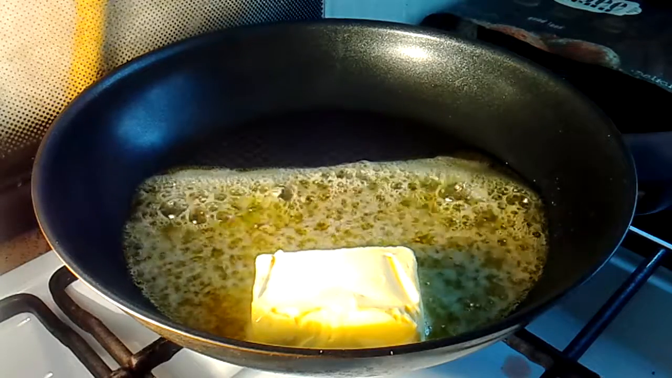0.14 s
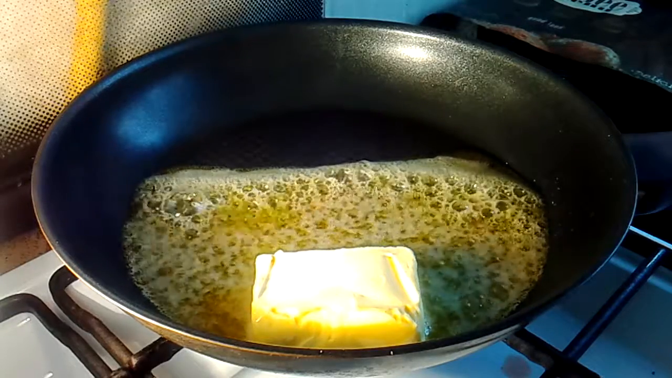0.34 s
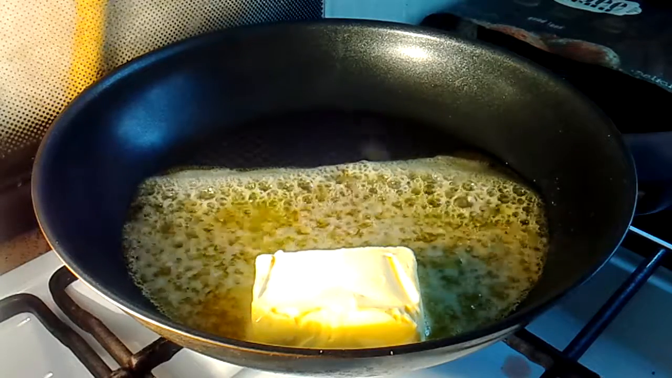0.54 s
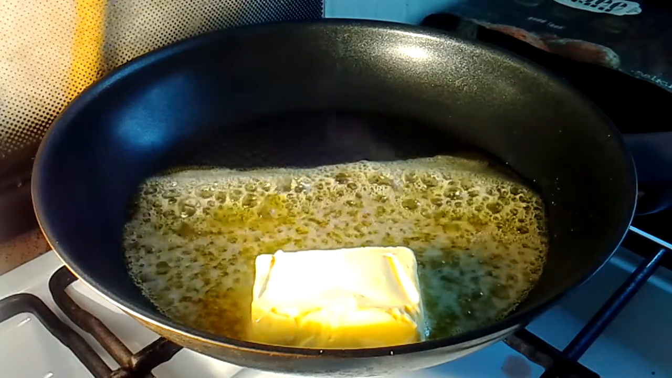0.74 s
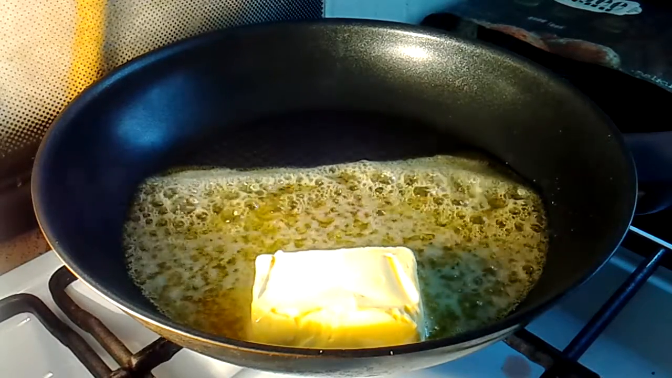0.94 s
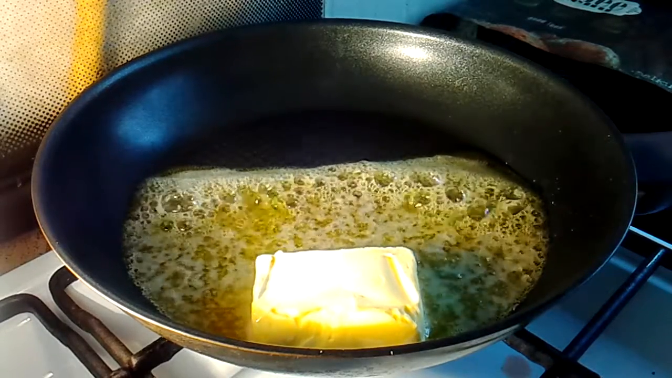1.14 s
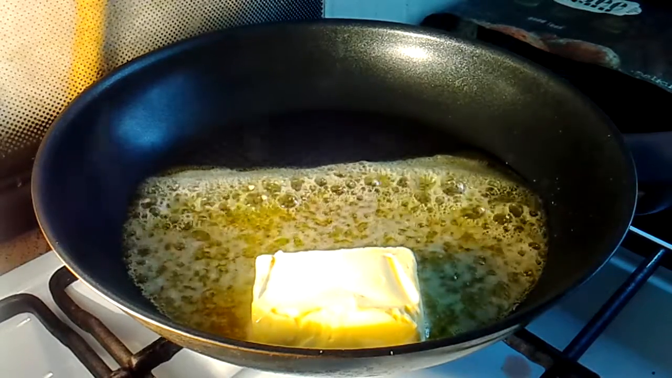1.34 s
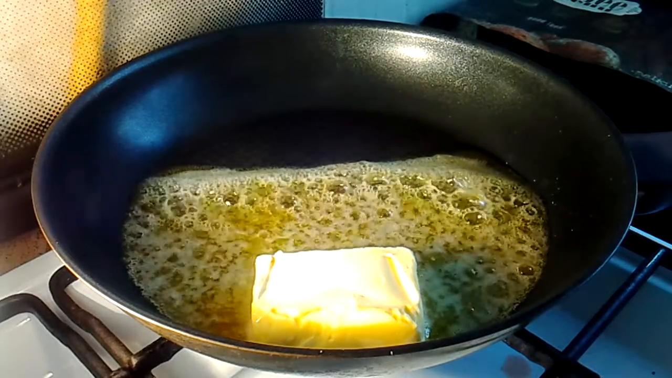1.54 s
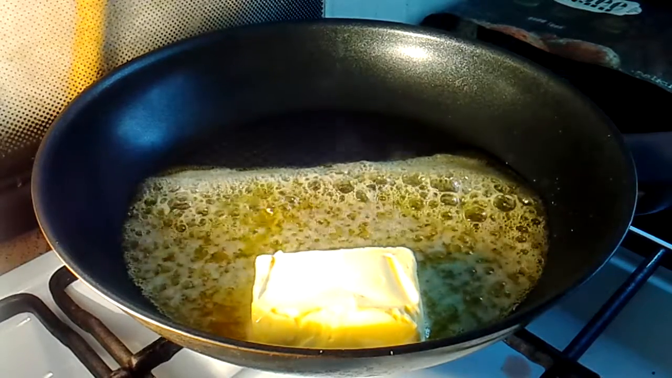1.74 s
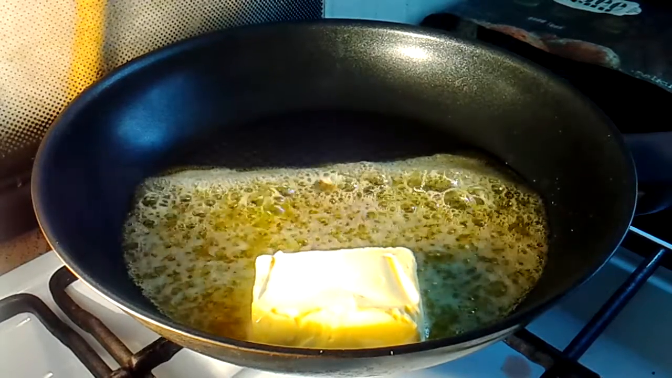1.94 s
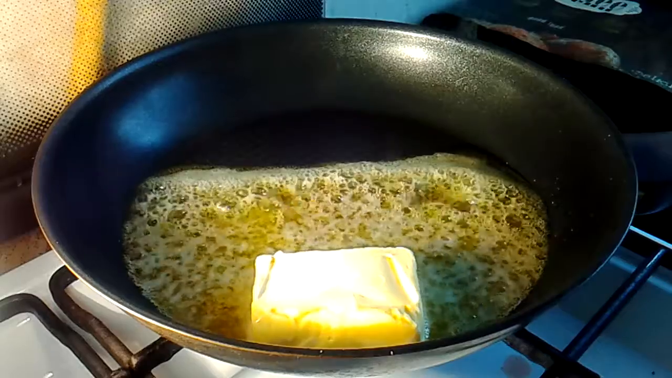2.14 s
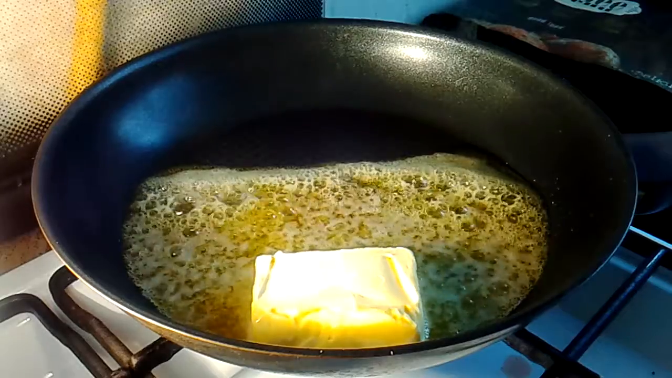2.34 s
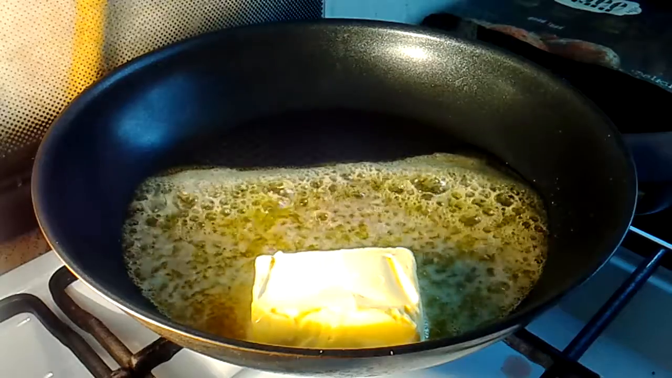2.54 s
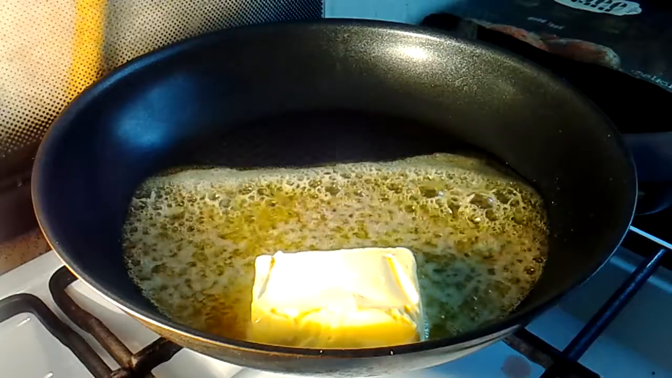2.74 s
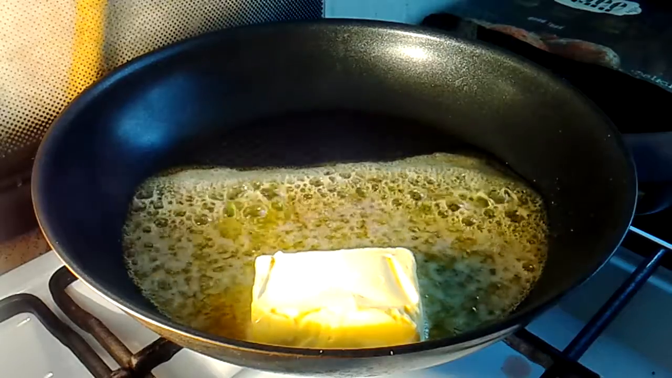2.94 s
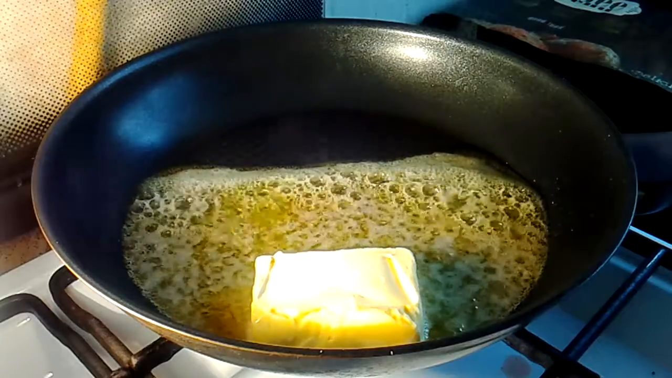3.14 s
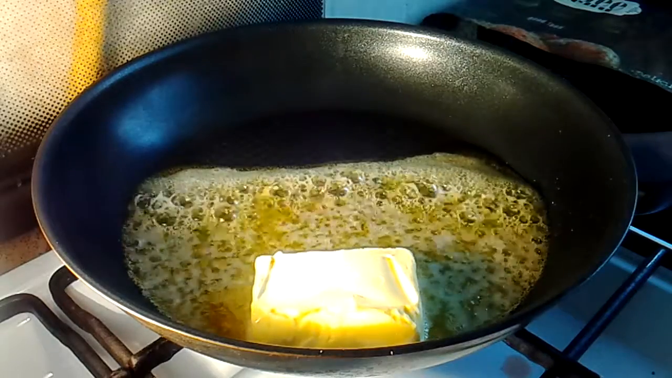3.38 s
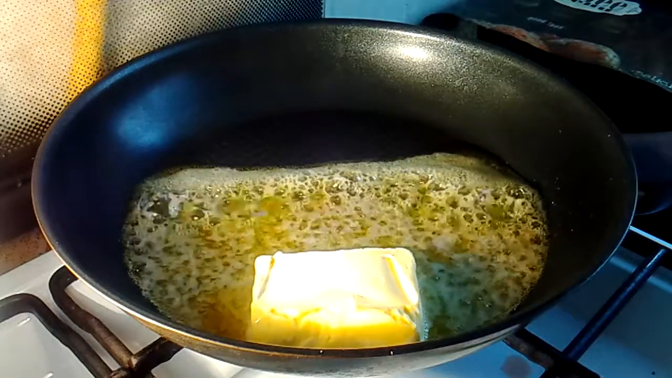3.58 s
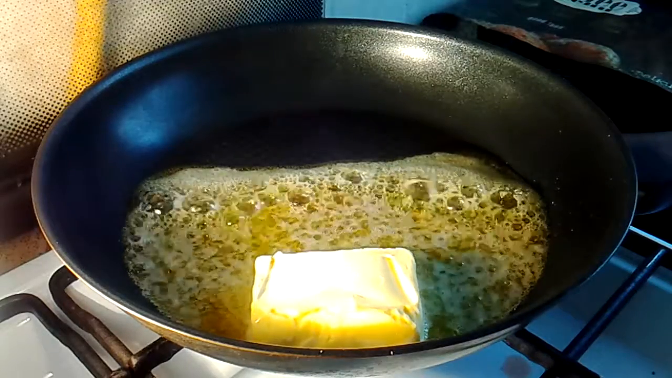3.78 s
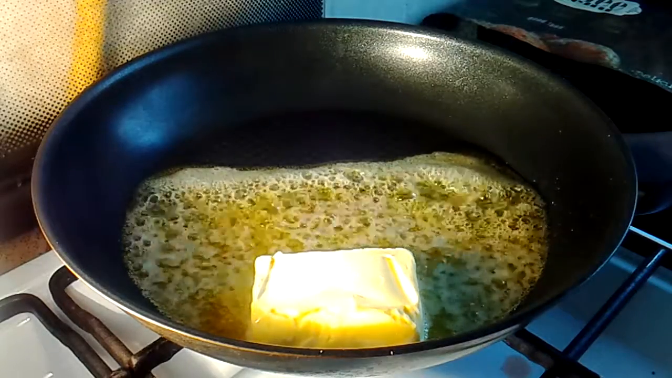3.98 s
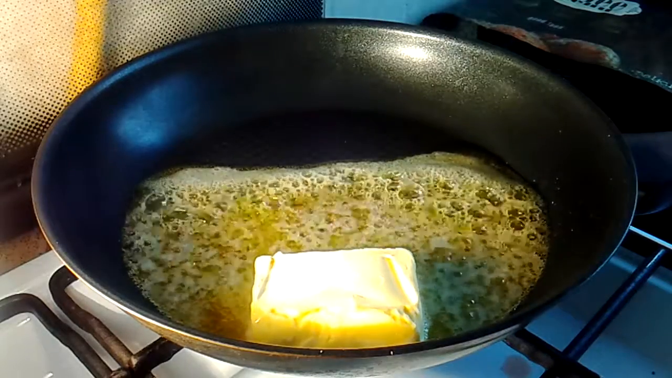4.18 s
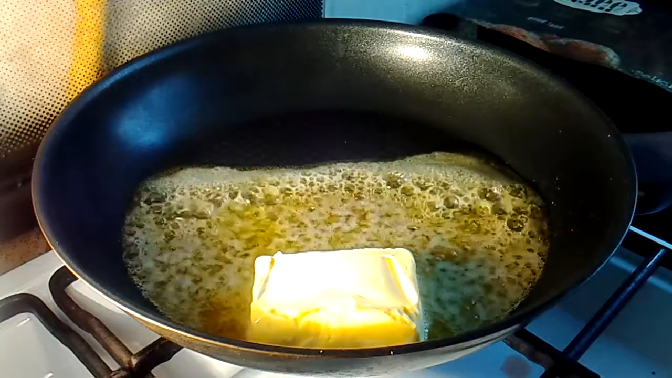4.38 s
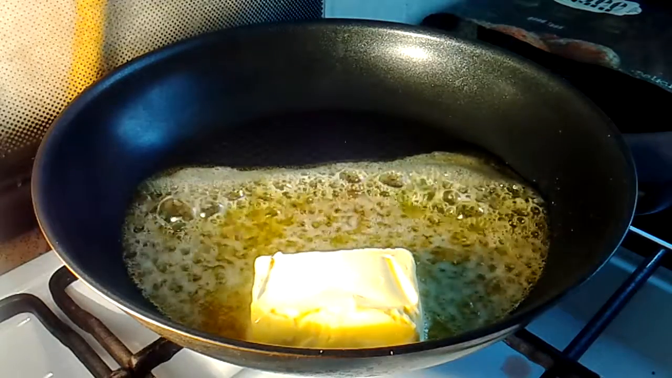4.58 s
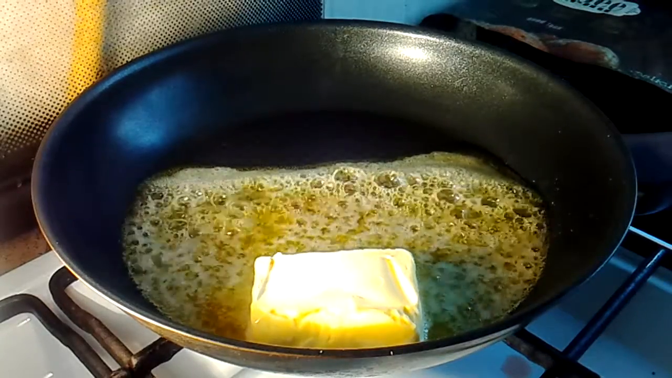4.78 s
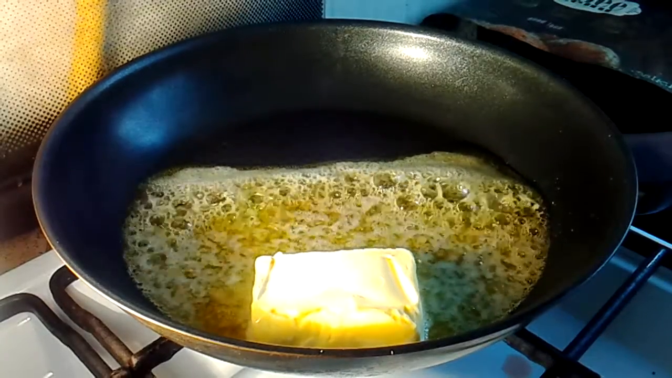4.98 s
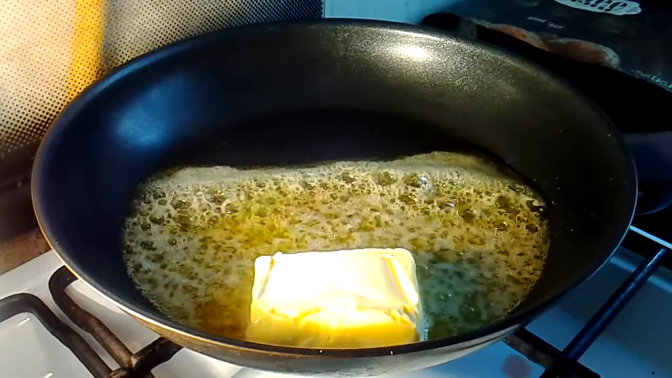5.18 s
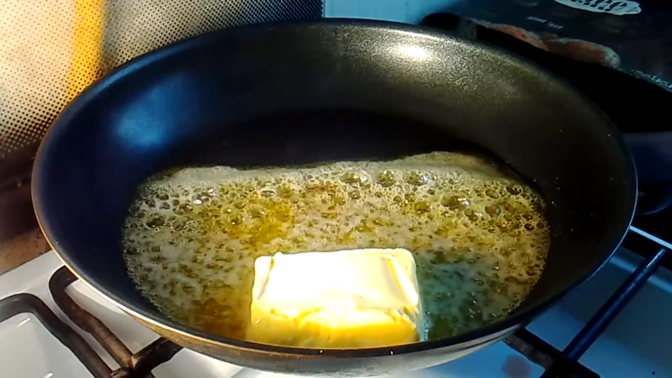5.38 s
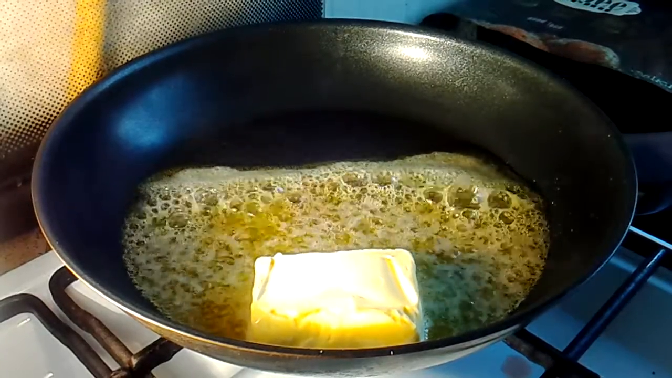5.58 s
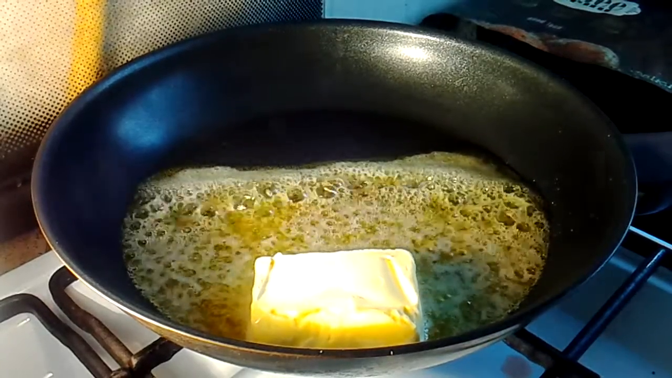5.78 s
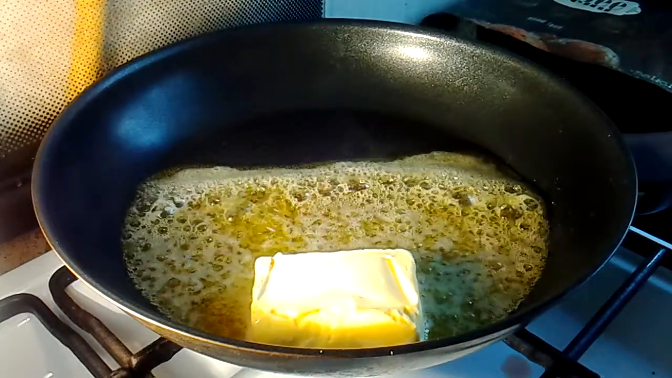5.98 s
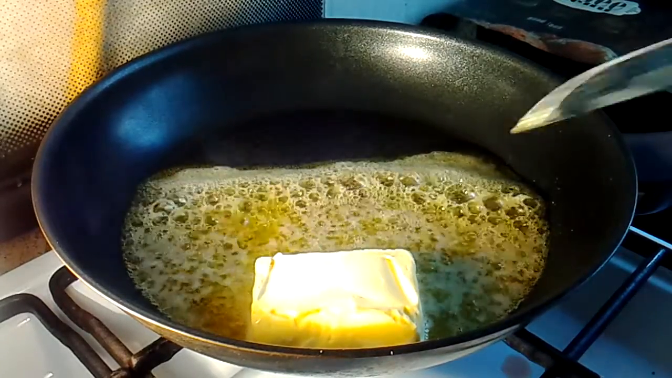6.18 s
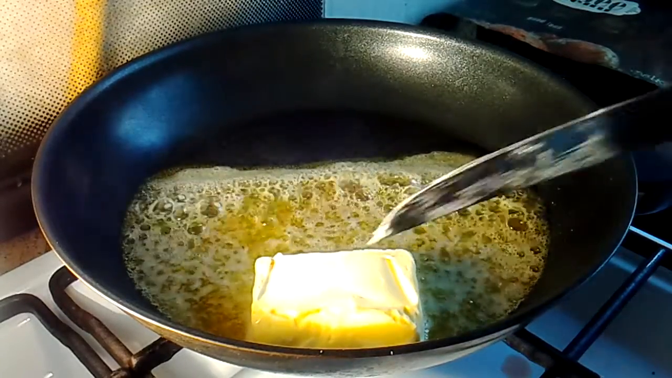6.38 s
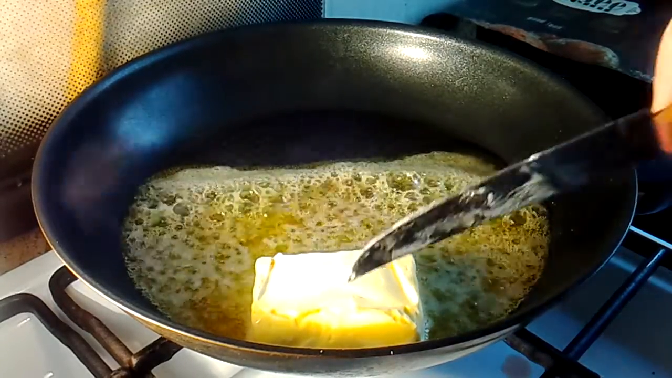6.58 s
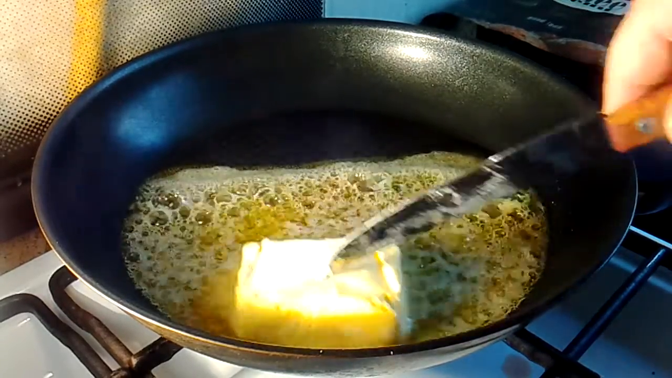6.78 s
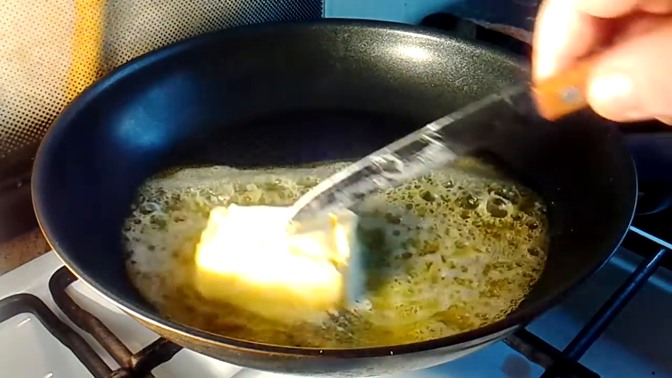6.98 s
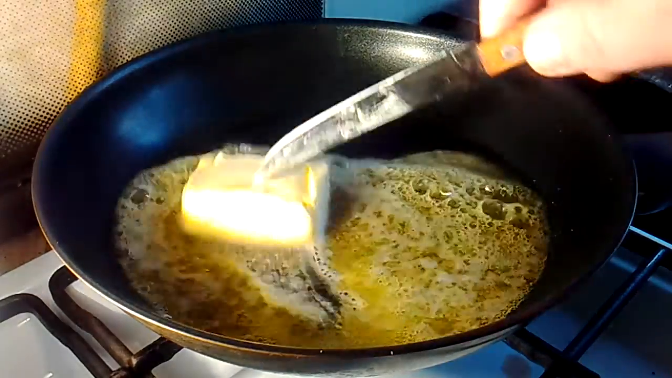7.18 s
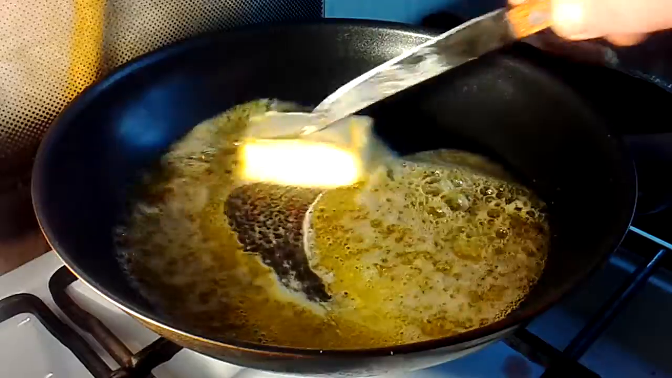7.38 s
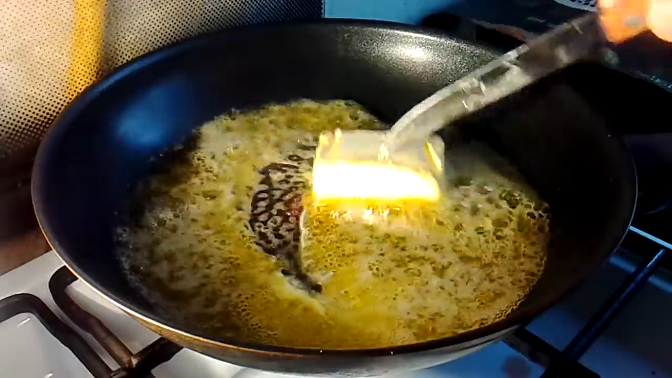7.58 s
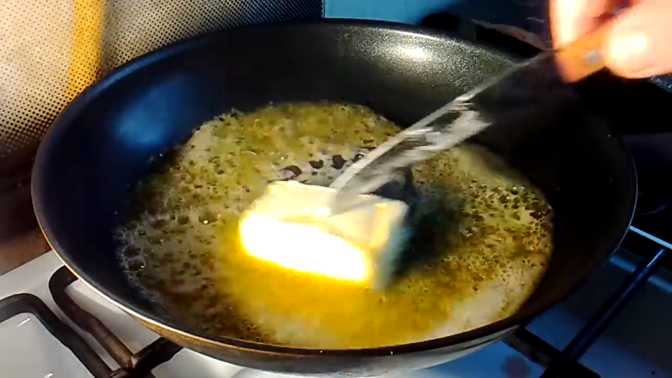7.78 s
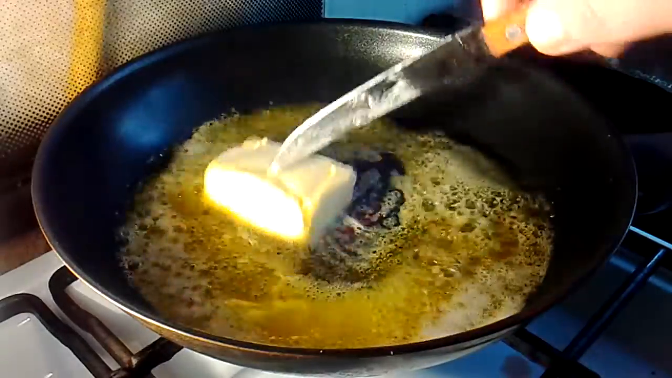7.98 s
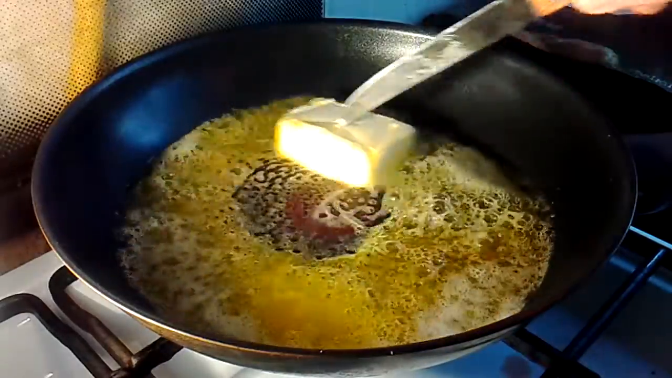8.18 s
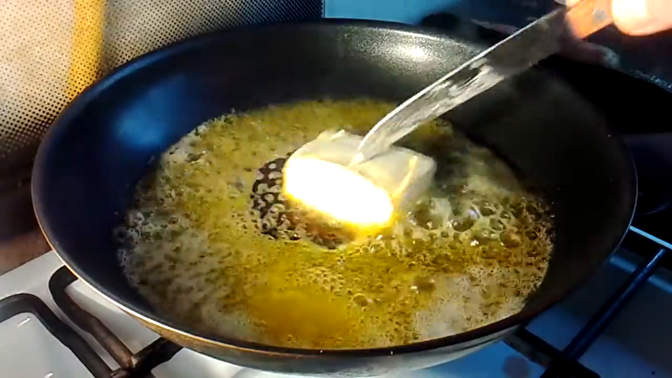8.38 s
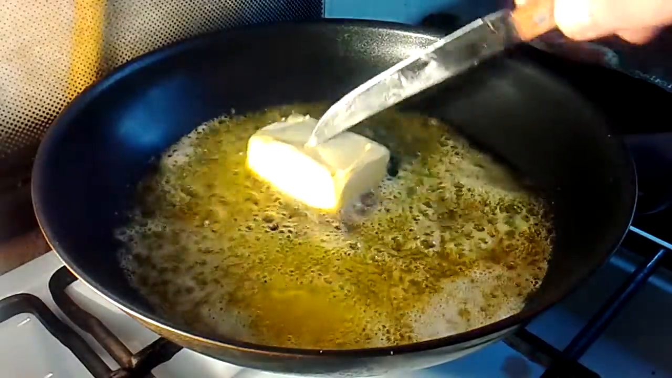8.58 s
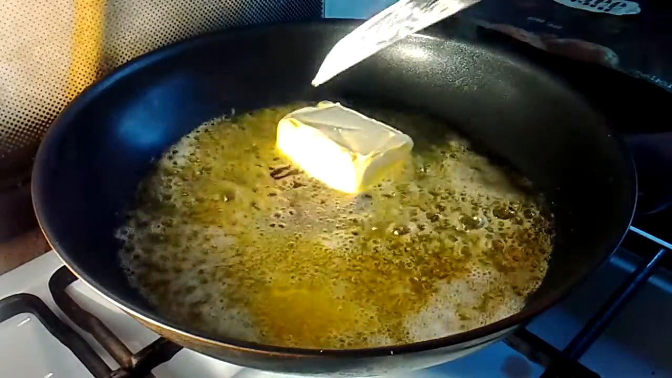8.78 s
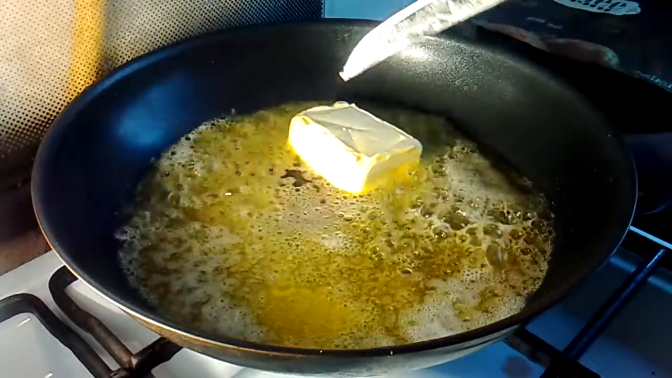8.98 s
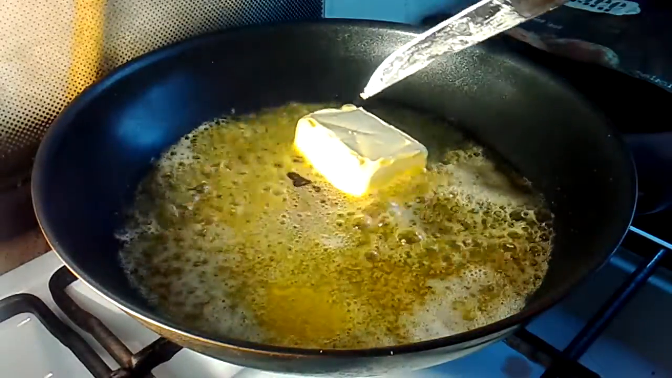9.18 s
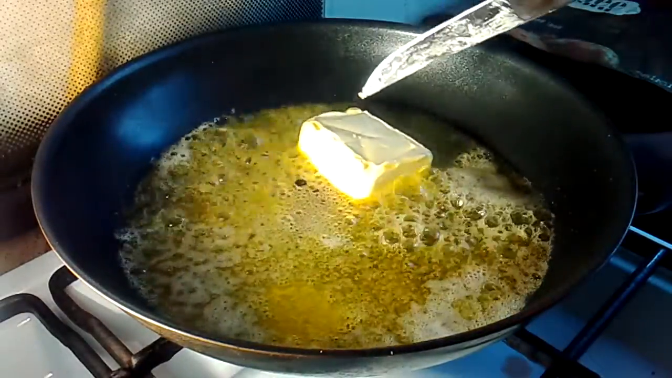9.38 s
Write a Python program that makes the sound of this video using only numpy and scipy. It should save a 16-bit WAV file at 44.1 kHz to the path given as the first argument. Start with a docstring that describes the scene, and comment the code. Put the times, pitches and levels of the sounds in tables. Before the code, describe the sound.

A fairly quiet butter simmer, heard by one close microphone, crackles steadily with tiny chirping bubbles, small surges and scattered larger pops. Faint muffled bumps and spitting fat punctuate it over a very low gas rush and hum. After about seven seconds the block is pushed round and the sizzle jumps up, thick and lively, with frequent louder pops, staying strong until it stops. Near echoes and a short tail suggest a small kitchen.

```python
"""Butter sizzles in a hot frying pan, heard close up by one microphone in a small kitchen.
The foam simmers as a crackle of tiny chirping bubbles over hiss; large bubbles pop as short rising rings.
As a knife slides the block round, fresh butter meets hot metal: a wet gargle, a bright fizz, a dense flare.
Fat spits in sharp ticks and a few soft bumps of gritty noise sound nearby.
Behind lie the gas flame's rush of coloured noise and a faint hum; near echoes and a short tail give the room."""
import sys
import numpy as np
from scipy import signal
from scipy.fft import rfft, irfft
from scipy.io import wavfile
from scipy.ndimage import uniform_filter1d

SR = 44100
rng = np.random.default_rng(int(sys.argv[2]) if len(sys.argv) > 2 else 0)


def dump_mix(stems):
    """Bounce the given channels to the path in sys.argv[1] as a 16-bit WAV at rate SR."""
    frames = np.atleast_2d(stems).T  # one column per channel
    limited = np.clip(frames, -1, 1)  # hard clip at full scale
    pcm = np.round(limited * 32767).astype(np.int16)
    wavfile.write(sys.argv[1], SR, pcm)


N = 415863
TIME = np.arange(N) / SR  # seconds

# large bubbles bursting: (time [s], level before trim [dB], pitch before scaling [Hz])
LARGE_BUBBLES = [(0.0435, -32, 3350), (0.0996, -33, 2660), (0.2037, -31, 3010), (0.357, -36, 2890),
                 (0.4025, -24, 2670), (0.416, -30, 2870), (0.5033, -32.5, 3540), (0.5912, -28, 2630),
                 (0.8238, -29.5, 2950), (0.9704, -29, 2710), (1.0234, -24, 2640), (1.1273, -34, 3730),
                 (1.1653, -32, 4300), (1.2168, -22.5, 2540), (1.2516, -29, 2800), (1.492, -29.5, 2830),
                 (1.5651, -28, 2740), (1.6558, -29, 4200), (1.6743, -34, 4260), (2.0484, -27, 3880),
                 (2.1892, -30, 2680), (2.2948, -30, 3130), (2.3838, -37, 2710), (2.458, -31, 2890),
                 (2.4932, -34, 2960), (2.524, -28, 2700), (2.5875, -28.5, 3850), (2.6372, -36, 3530),
                 (2.68, -38, 3700), (2.8524, -31.5, 4300), (2.9825, -39, 3640), (3.1685, -31, 2870),
                 (3.2962, -33, 3030), (3.3257, -27, 2620), (3.5345, -26, 2630), (3.727, -31, 2070),
                 (3.8145, -31.5, 3850), (3.8507, -26, 2630), (3.9746, -34, 4540), (4.04, -34.5, 2900),
                 (4.3083, -25.5, 2750), (4.446, -29, 3680), (4.8287, -26.5, 2670), (4.9458, -26.5, 2630),
                 (5.103, -26.5, 2740), (5.2684, -27, 2890), (5.3184, -30, 2600), (5.3762, -28.5, 2400),
                 (5.58, -33, 2930), (5.88, -25.5, 2700), (5.9627, -24, 2660), (6.132, -31.5, 2720),
                 (6.228, -30.5, 2620), (6.3623, -26.5, 2750), (6.408, -29.5, 2900), (6.4222, -30, 2540),
                 (6.5027, -32, 2490), (6.6139, -33.5, 2540), (6.8871, -22.5, 2880), (7.0015, -33.5, 2680),
                 (7.0864, -31, 2900), (7.1264, -32, 3690), (7.13, -30, 3900), (7.4916, -27, 2000),
                 (7.5446, -24, 2360), (7.5965, -24, 2970), (7.7112, -29, 3350), (7.8484, -21.5, 3640),
                 (8.0165, -21, 2360), (8.1882, -23, 2350), (8.2069, -19, 2340), (8.3262, -25, 3260),
                 (8.4128, -25, 3280), (8.419, -21, 3100), (8.425, -27, 3000), (8.4787, -22, 2700),
                 (8.5438, -22.5, 3700), (8.6928, -20.5, 3230), (8.932, -22, 3130), (9.0031, -22.5, 3100),
                 (9.0257, -24, 3040), (9.1328, -19, 3600), (9.1413, -24, 3700), (9.22, -22.5, 3000),
                 (9.3221, -24, 4500)]


def from_db(db):
    """Decibels to gain."""
    return 10 ** (np.asarray(db) / 20)


def rms_one(x):
    """Scale to rms 1."""
    return x / np.sqrt(np.mean(x ** 2) + 1e-20)


def in_time(rows):
    """Each column of a curve, interpolated to every sample."""
    s, *columns = np.transpose(rows)
    return [np.interp(TIME, s, column) for column in columns]


def high_pass(x, hz):
    """Second-order Butterworth high-pass."""
    return signal.sosfilt(signal.butter(2, hz, "high", fs=SR, output="sos"), x)


def band(x, low_hz, high_hz):
    """Butterworth band-pass."""
    edges = [max(low_hz, 10), min(high_hz, SR / 2 - 100)]
    return signal.sosfilt(signal.butter(2, edges, "band", fs=SR, output="sos"), x)


def dying_power(kicks, fade_s):
    """Each kick of power dies away exponentially; the floor keeps it positive."""
    return signal.lfilter([1], [1, -np.exp(-1 / (fade_s * SR))], kicks + 1e-18)


def swell(age):
    """Rise to 1 at age 1, then a slower fall."""
    return age * np.exp(1 - age)


def drift(rate):
    """Random wander of rms 1, with a new target rate times a second."""
    knots = rng.standard_normal(4096)
    return rms_one(np.interp(TIME * rate, np.arange(len(knots)), knots))


def coloured(x, colour, size=4096):
    """Causal (minimum-phase) filter that follows a spectrum."""
    hz, db = np.transpose(colour)
    grid = np.maximum(np.arange(size // 2 + 1) * SR / size, 1)
    gain = from_db(np.interp(np.log(grid), np.log(hz), db))
    # fold the cepstrum on to positive time for minimum phase
    cepstrum = irfft(np.log(gain))
    cepstrum[1:size // 2] *= 2
    cepstrum[size // 2 + 1:] = 0
    response = irfft(np.exp(rfft(cepstrum)))
    return signal.oaconvolve(x, response)[:N]


def hum():
    """Mains hum of the kitchen: steady sine."""
    # (frequency [Hz], rms level [dB])
    tones = [(100, -79)]
    return sum(from_db(db) * np.sqrt(2) * np.sin(2 * np.pi * hz * TIME) for hz, db in tones)


def flame():
    """The gas flame's soft rush: steady noise, strongest in the bass."""
    # spectrum of the flame: (frequency [Hz], relative level [dB])
    flame_colour = [(20, 3), (50, -2.5), (80, -23), (130, 3.0), (170, -3), (225, 0), (320, -3), (500, -0.5),
                    (1200, -7), (4000, -13), (15000, -36.5)]
    rush = rms_one(coloured(rng.standard_normal(N), flame_colour))
    return from_db(-65) * rush


def bumps():
    """Soft bumps and shuffles at the stove: dull, slightly gritty noises that swell and die."""
    # (time [s], level before trim [dB], centre [Hz], width [Hz], rise time [s])
    stove_bumps = [(0.125, -53.5, 540, 180, 0.013), (0.17, -61.5, 380, 580, 0.02),
                   (0.225, -66.5, 131, 30, 0.02), (0.756, -63, 190, 490, 0.032),
                   (0.764, -64.5, 133, 19, 0.023), (0.95, -61.5, 960, 720, 0.047),
                   (1.255, -55, 980, 920, 0.048), (1.28, -66, 220, 270, 0.045),
                   (1.811, -58, 127, 14, 0.031), (1.815, -60.5, 280, 570, 0.013),
                   (2.14, -57, 950, 1100, 0.0096), (2.36, -62, 1000, 360, 0.031),
                   (2.585, -53, 1040, 600, 0.0096), (4.826, -60.5, 130, 140, 0.017),
                   (4.842, -54.5, 520, 950, 0.011), (4.935, -57, 480, 860, 0.014),
                   (5.278, -56.5, 520, 480, 0.0078), (5.355, -62.5, 297, 850, 0.019),
                   (5.59, -56.5, 82, 48, 0.017), (5.65, -58.5, 394, 700, 0.023),
                   (5.85, -61, 600, 940, 0.0098), (7.71, -48, 700, 1400, 0.007),
                   (9.232, -61, 251, 350, 0.028)]
    level_window_s, trim_db = 0.014, 2.0
    out = np.zeros(N + SR)
    for s, db, hz, width_hz, rise_s in stove_bumps:
        age = np.arange(SR) / SR / rise_s
        low_hz = np.hypot(hz, width_hz / 2) - width_hz / 2  # hz is the geometric centre
        grit = rng.standard_normal(2 * SR) * (rng.random(2 * SR) < 2000 / SR)  # 2000 grains a second
        noise = band(grit, low_hz, low_hz + width_hz)[SR:]
        # even out the grit's short-term level, so that the swell alone shapes the bump
        power = uniform_filter1d(noise ** 2, int(level_window_s * SR))
        noise = noise / np.sqrt(power + 1e-18)
        start = int(s * SR)
        out[start:start + SR] += from_db(db + trim_db) * swell(age) * noise
    return out[:N]


def bursts(per_s, spread_db, clump_db):
    """Sample and signed height of bursts that come in clumps, many small and few large."""
    chance = per_s * from_db(clump_db * drift(70)) / SR
    at = np.flatnonzero(rng.random(N) < chance)
    size = rng.laplace(size=N)[at]
    sign = np.sign(size)
    height = rms_one(from_db(spread_db * np.minimum(abs(size), 5))) * sign
    # a film can only stretch so far
    return at, np.tanh(height / 4)


def chirps(at, height, hz, swell_s, glide, size=64):
    """A bubble's cavity rings through the widening hole in its film: the pitch rises as the ring dies."""
    t = np.arange(size, dtype=np.float32) / SR
    height, hz, swell_s = np.float32([height, hz, swell_s])[:, :, None]
    age = t / swell_s
    cycles = hz * t * (1 + glide * age / (age + 2))
    wave = height * swell(age) * np.sin(2 * np.pi * cycles)
    samples = at[:, None] + np.arange(size)
    return np.bincount(samples.ravel(), wave.ravel(), N)[:N]


def trains(at, height, hz, gap_s, fade_db, swell_s, count=5):
    """One vent lets out several bubbles in quick succession, of like pitch and tending to weaken."""
    gaps, level, detune, damping = rng.standard_normal((len(at), count, 4)).transpose(2, 0, 1)
    later = np.arange(count) > 0  # the first bubble keeps its time, height and pitch
    delay = np.cumsum(later * gap_s * SR * from_db(5 * gaps), axis=1)
    when = at[:, None] + delay.astype(int)
    follow_db = fade_db * np.sqrt(np.arange(count)) + 2.3 * level * later
    height = height[:, None] * from_db(follow_db)
    hz = hz[:, None] * (1 + 0.1 * detune * later)
    swell_s = swell_s * from_db(1.8 * damping.ravel())
    return chirps(when.ravel(), height.ravel(), hz.ravel(), swell_s, glide=0.14, size=280)


def crackle(per_s, spread_db, clump_db, swell_s, snap_db):
    """Small bubbles of every pitch: each film snaps and its cavity chirps. Rms 1."""
    at, height = bursts(per_s, spread_db, clump_db)
    pitch, damping = rng.random((2, N))[:, at]
    rings = chirps(at, height, 500 + 10500 * pitch, swell_s * (.5 + damping), glide=0.044)
    snaps = rms_one(np.bincount(at, height, N))
    return rms_one(rms_one(rings) + from_db(snap_db) * snaps)


def cracks(per_s, spread_db, tear_s, low_hz, high_hz):
    """Taut films tear with a dry, ragged crack, too short to have a pitch. Rms 1."""
    at, height = bursts(per_s, spread_db, clump_db=0.5)
    power = dying_power(np.bincount(at, height ** 2, N), tear_s)
    return rms_one(band(np.sqrt(power) * rng.standard_normal(N), low_hz, high_hz))


def ticks(per_s, spread_db):
    """The tiniest droplets flash to steam with a bright tick. Rms 1."""
    at, height = bursts(per_s, spread_db, clump_db=0)
    pitch, damping = rng.random((2, N))[:, at]
    hz = 6500 + 8500 * pitch ** 2
    return rms_one(chirps(at, height, hz, 0.00012 * (.5 + damping), glide=0.047))


def gurgle(per_s, spread_db, low_hz, top_hz):
    """Middling bubbles come in short trains, each at its own pitch. Rms 1."""
    at, height = bursts(per_s, spread_db, clump_db=3)
    hz = low_hz * (top_hz / low_hz) ** rng.random(N)[at]
    return rms_one(trains(at, height, hz, gap_s=.004, fade_db=-2.0, swell_s=0.00043))


def sizzle(grains, hiss_db, seethe_db, thin_hz, colour):
    """Bursts over the hiss of countless tiny ones and a low seething, coloured by the pan; treble rms 1."""
    hiss, seethe = rng.standard_normal((2, N))
    grains = high_pass(grains, thin_hz)
    flutter_db = 4.5 * drift(55)
    seethe = rms_one(band(seethe, 78, thin_hz)) * from_db(seethe_db + flutter_db)
    sound = coloured(grains + from_db(hiss_db) * hiss + seethe, colour)
    return sound / np.std(band(sound, 2500, 9000))


def spits():
    """Droplets of fat thrown from the pan: a tick each, some with a very sharp edge."""
    # (time [s], tick level before trim [dB], sharp edge against the tick before trim [dB])
    fat_droplets = [(1.329, -30, -41), (2.4415, -35, -40), (2.5635, -46, -24), (3.3927, -32.5, -46),
                    (4.7252, -33, -34), (5.356, -30, -33), (6.4674, -27, -47), (7.9406, -18.5, -37),
                    (8.4407, -29, -33), (8.5424, -26, -18), (9.0668, -26, -33)]
    s, db, edge_db = np.transpose(fat_droplets)
    at = (s * SR).astype(int)
    tick = band(np.bincount(at, from_db(db + 16), N), 7200, 9000)
    tick = band(tick, 3000, 7900)
    edge = band(np.bincount(at, from_db(db + edge_db + 14), N), 9000, 17000)
    return tick + edge


def surges():
    """Power of foam patches collapsing in rushes of small bursts: quick onset, hold, then decay."""
    # (time [s], length [s], level before foam trim [dB])
    collapses = [(0.198, 0.061, -46.5), (0.35, 0.13, -52), (0.948, 0.08, -55), (1.13, 0.05, -46),
                 (1.243, 0.15, -51.5), (2.323, 0.02, -45.5), (2.362, 0.1, -46.5), (2.495, 0.013, -44.5),
                 (2.558, 0.032, -48.5), (2.654, 0.023, -46), (2.767, 0.015, -49), (2.965, 0.07, -52.5),
                 (3.246, 0.075, -46.5), (3.87, 0.03, -52), (4.28, 0.17, -51.5), (4.66, 0.13, -50),
                 (4.917, 0.043, -49), (5.239, 0.04, -48.5), (5.35, 0.066, -49), (5.56, 0.07, -48.5),
                 (5.714, 0.19, -54.5), (5.926, 0.027, -49.5), (6.245, 0.039, -50), (6.365, 0.046, -48),
                 (6.466, 0.052, -51.5), (6.765, 0.058, -48)]
    attack_s, fade_s = 0.004, 0.0031
    power = np.zeros(N)
    for s, length_s, db in collapses:
        onset = np.clip((TIME - s) / attack_s, 0, 1) ** 2
        decay = np.exp(-np.maximum(TIME - s - length_s, 0) / fade_s)
        power += from_db(db) ** 2 * onset * decay
    return power


def spray():
    """Power of the extra crackle that starts just before a large bubble's burst and dies away after it."""
    lead_s, fade_s, spray_db = 0.00153, 0.015, -22
    s, db, hz = np.transpose(LARGE_BUBBLES)
    at = ((s - lead_s) * SR).astype(int)
    return dying_power(np.bincount(at, from_db(db + spray_db) ** 2, N), fade_s)


def foam():
    """The fine crackle of the melted butter: a steady simmer, surges and the spray after large bursts."""
    # foam simmering round the block: (time [s], level before foam trim [dB])
    simmer = [(0.0, -49), (0.7, -48.5), (1.3, -48), (1.95, -48), (2.5, -49.5), (2.85, -50.5), (3.6, -51.5),
              (4.1, -50), (4.5, -50.5), (5.2, -48.5), (5.8, -48), (6.6, -49.5), (7.33, -50)]
    # spectrum of the foam: (frequency [Hz], relative level [dB])
    foam_colour = [(150, -14), (700, -15.5), (1050, -10.5), (1690, -8.5), (2010, -3), (2850, -0.5),
                   (3300, -5.5), (3700, -1.5), (5000, -6.5), (5600, -6.5), (6900, -16.5), (7900, -15.5),
                   (10500, -35), (15500, -44.5)]
    simmer_db, = in_time(simmer)
    grains = crackle(per_s=1400, spread_db=3.2, clump_db=2.5, swell_s=0.00015, snap_db=-1.0)
    grains += from_db(-6.5) * cracks(per_s=95, spread_db=1.3, tear_s=.0007, low_hz=2260, high_hz=7540)
    grains += from_db(-4.5) * ticks(per_s=200, spread_db=4.0)
    grains += from_db(-14.0) * gurgle(per_s=55, spread_db=0.5, low_hz=1750, top_hz=5660)
    # the boiling is never quite even: it sputters by 1 dB rms round the -2.5 dB trim
    sputter = from_db(-2.5 + 1 * drift(22))
    boiling = sputter ** 2 * (from_db(simmer_db) ** 2 + surges())
    level = np.sqrt(boiling + spray())
    return level * sizzle(grains, hiss_db=-9.0, seethe_db=-12.5, thin_hz=1290, colour=foam_colour)


def pops():
    """Large bubbles at the edge of the foam: a snap, a few cycles of rising ring, then smaller followers."""
    s, db, hz = np.transpose(LARGE_BUBBLES)
    at = ((s + .0005) * SR).astype(int)
    rings = trains(at, from_db(db - 2), hz * 0.923, gap_s=.005, fade_db=-11.5, swell_s=0.00055)
    snap_at = at + round(.0004 * SR)
    snaps = band(np.bincount(snap_at, from_db(db + 12.5), N), 2900, 5700)
    return rings + band(snaps, 1000, 5600)


def wave():
    """A wave of melt runs onto bare metal and boils in large, low bubbles: a short, wet gargle."""
    start_s, rise_s, level_db = 7.462, 0.04, -44.5
    age = np.maximum(TIME - start_s, 0) / rise_s
    gargle = gurgle(per_s=160, spread_db=1.0, low_hz=1770, top_hz=2120)
    return from_db(level_db) * swell(age) * rms_one(band(gargle, 1850, 2600))


def sear():
    """The wet film behind the sliding block flashes off in the tiniest droplets: a thin bright fizz."""
    # (time [s], level [dB])
    film_fizz = [(6.95, -105), (7.1, -84), (7.33, -78), (7.47, -72), (7.8, -71.5), (8.1, -80), (8.6, -105)]
    level_db, = in_time(film_fizz)
    return from_db(level_db) * rms_one(band(ticks(per_s=2500, spread_db=8.0), 7500, 16000))


def flare():
    """Water in the fresh butter boils off at once: far denser bursts, large bubbles first."""
    # fresh butter on bare metal: (time [s], level before trim [dB])
    flare_level = [(7.39, -50), (7.47, -42), (7.62, -37), (8.0, -37.5), (8.32, -36.7), (8.8, -38.5),
                   (9.42, -40)]
    # spectrum of the flare: (frequency [Hz], relative level [dB])
    flare_colour = [(90, -25), (300, -17.5), (820, -16), (1300, -8.5), (1640, -11), (2120, -4.5), (3100, 0),
                    (4400, -3.5), (4850, -6), (5500, -4.5), (6900, -13.5), (7900, -12.5), (10700, -32),
                    (15500, -36)]
    start_s, attack_s, trim_db = 7.35, 0.021, -0.08
    level_db, = in_time(flare_level)
    age = np.maximum(TIME - start_s, 0)
    grains = crackle(per_s=4500, spread_db=4.0, clump_db=1.4, swell_s=0.00025, snap_db=-1.5)
    grains += from_db(-9.5) * cracks(per_s=240, spread_db=1.5, tear_s=0.00033, low_hz=2300, high_hz=7040)
    grains += from_db(-11.0) * ticks(per_s=230, spread_db=-0.5)
    grains += from_db(-9.0) * gurgle(per_s=130, spread_db=1.5, low_hz=1840, top_hz=5000)
    sound = sizzle(grains, hiss_db=-7, seethe_db=-12.5, thin_hz=1100, colour=flare_colour)
    # large bubbles lie below 2500 Hz; they come in waves and thin out as the water boils off
    large = signal.sosfiltfilt(signal.butter(2, 2500, fs=SR, output="sos"), sound)
    churn_db = 0.5 * drift(16)
    large_db = 1 - 1.5 * age + churn_db  # sags 1.5 dB a second
    sound = sound + large * (from_db(large_db) - 1)
    onset = np.minimum(age / attack_s, 1)
    return onset * from_db(level_db + trim_db) * sound


def reflections():
    """From one spot in the pan: a few scattered near echoes and a short diffuse tail."""
    # echoes from pan wall, hob and back wall: (delay [s], level [dB])
    near_echoes = [(.0014, -9), (.0045, -33), (.0079, -18)]
    t60_s, tail_db = 0.6, -5.5
    t = TIME[:SR // 2]
    tail, near = rng.standard_normal((2, len(t)))
    tail = tail * from_db(-60 * t / t60_s) * (t > .003)
    response = from_db(tail_db) * tail / np.linalg.norm(tail)
    for delay_s, db in near_echoes:
        scatter = near * (t >= delay_s) * np.exp(-abs(t - delay_s) / 0.0015)
        response += from_db(db) * scatter / np.linalg.norm(scatter)
    return response


def kitchen(x, count=4):
    """The bursts move about the pan, and each spot reaches the walls by its own paths."""
    share = np.array([drift(60) for _ in range(count)])
    share = share / np.linalg.norm(share, axis=0)  # the spots' total power stays even
    echoes = sum(signal.oaconvolve(x * spot, reflections())[:N] for spot in share)
    return x + echoes


def scene():
    """The pan and the bumps in the kitchen, over the flame and hum."""
    pan = foam() + wave() + flare() + sear() + pops() + spits()
    return (kitchen(pan + bumps()) + flame() + hum())[None]


def record(dry):
    """The top is cut steeply; the signal rests slightly below zero."""
    cutoff_hz, offset = 15500, -.0019
    steep = signal.ellip(10, .1, 70, cutoff_hz, fs=SR, output="sos")
    return signal.sosfilt(steep, dry) + offset


dry = scene()
out = record(dry)
dump_mix(out)
```